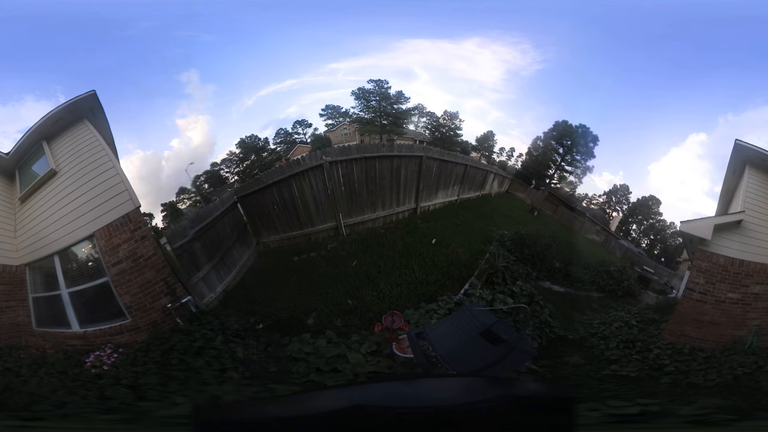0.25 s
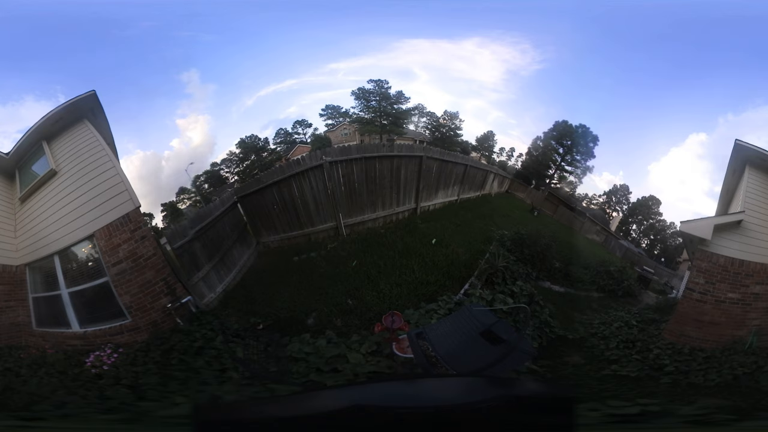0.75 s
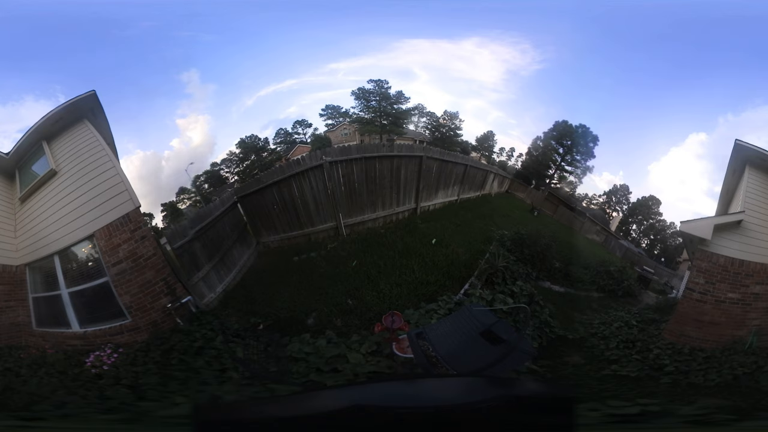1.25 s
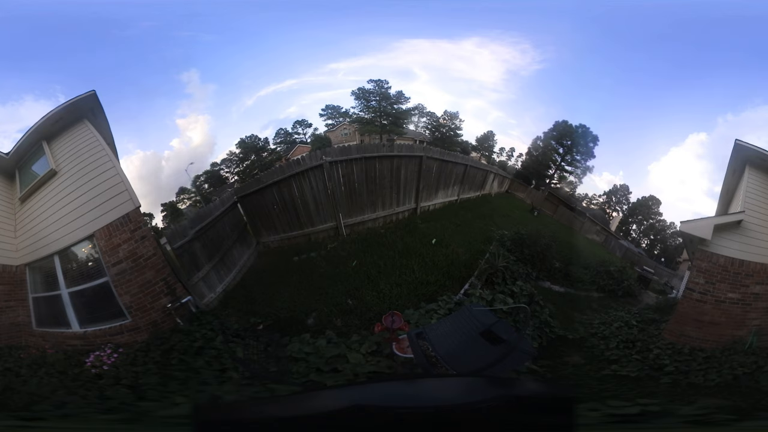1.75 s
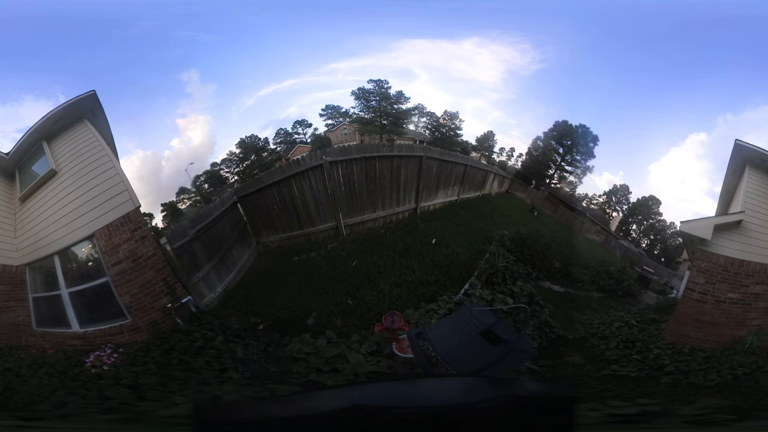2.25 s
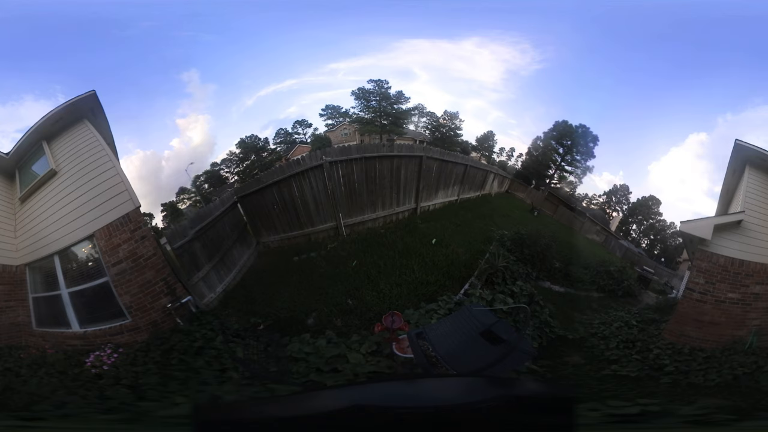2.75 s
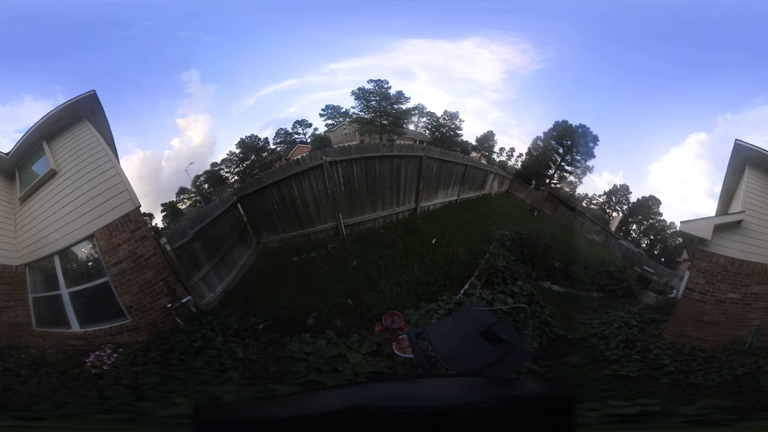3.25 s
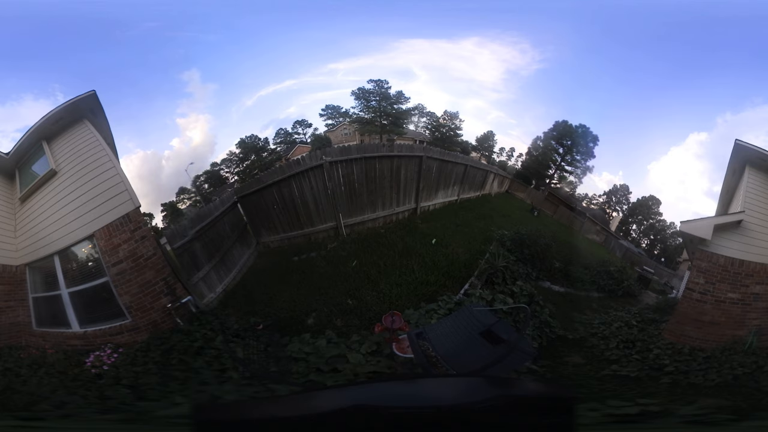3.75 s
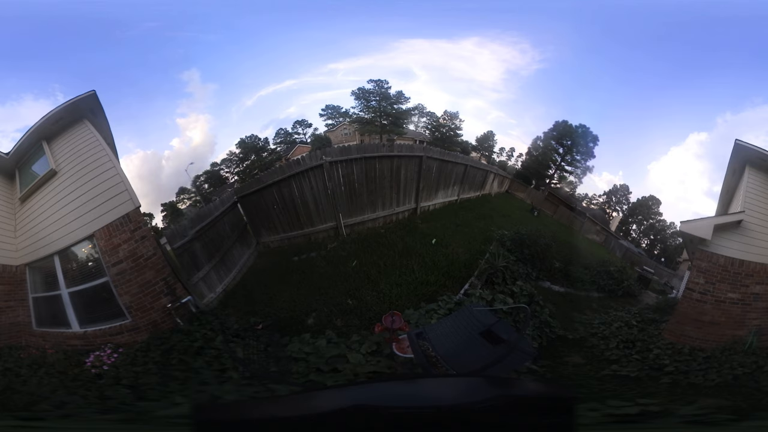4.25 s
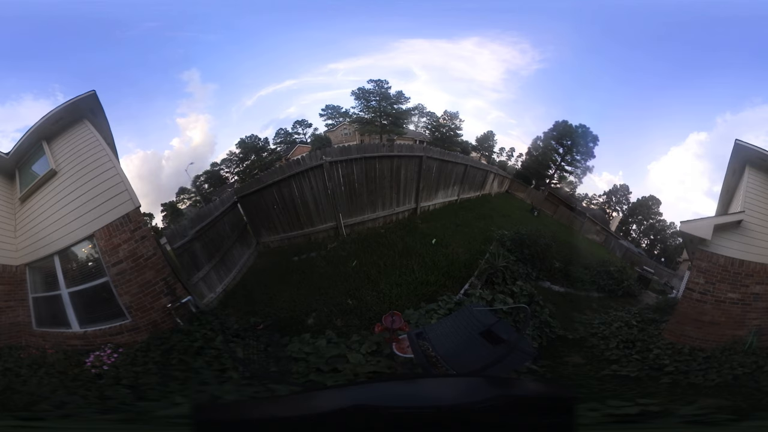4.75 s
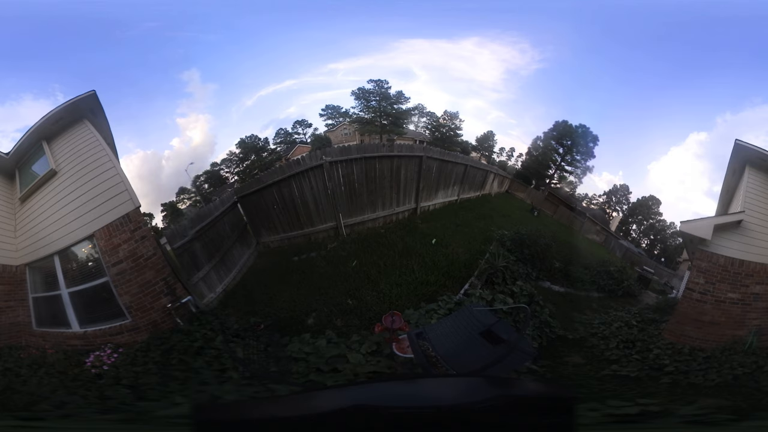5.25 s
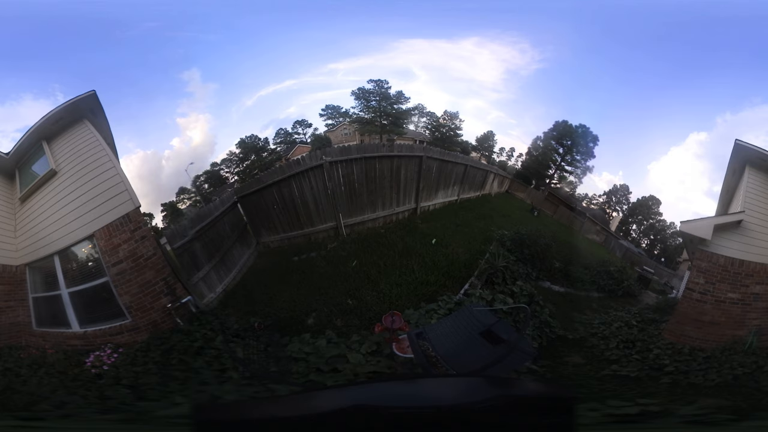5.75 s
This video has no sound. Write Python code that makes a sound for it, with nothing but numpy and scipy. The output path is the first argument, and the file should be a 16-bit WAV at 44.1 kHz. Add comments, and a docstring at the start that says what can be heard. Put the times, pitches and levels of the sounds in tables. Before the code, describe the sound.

A deep throbbing engine climbs in pitch and passes beyond a backyard fence with rushing tyres, while cicadas drone steadily and a bird whistles once.

```python
"""A low, throbbing drone, most like a six-cylinder engine, climbs in pitch and passes beyond a back-yard fence.
Its note, built from multiples of the engine cycle, swells and fades among the walls.
Filtered noise makes a rush of tyres, strongest when nearest, and a low neighbourhood wash.
Cicadas drone all round: wide noise bands, narrow unsteady tones and one buzz pulsed by clicks.
A bird gives one falling whistle: gliding sines with an echo and a short scattered tail."""
import sys
import numpy as np
from scipy import signal
from scipy.fft import rfft, irfft, next_fast_len
from scipy.io import wavfile
from scipy.ndimage import map_coordinates

SR = 44100
rng = np.random.default_rng(int(sys.argv[2]) if len(sys.argv) > 2 else 0)


def dump(signal):
    """Clip the signal to [-1, 1] and save it as 16-bit WAV at the path in sys.argv[1]."""
    limited = np.clip(np.atleast_2d(signal).T, -1, 1)
    pcm = np.round(limited * 32767).astype(np.int16)
    wavfile.write(sys.argv[1], SR, pcm)


N = 265658

# a straight road: the moment of closest approach, its distance, the road speed
NEAREST_S, DISTANCE_M, ROAD_M_PER_S = 2.85, 7.53, 15.44


def amp(db):
    """Decibels to gain."""
    return 10 ** (np.asarray(db) / 20)


def unit(x):
    """Scale to rms 1."""
    return x / np.sqrt(np.mean(np.abs(x) ** 2) + 1e-20)


def along(points, hz):
    """Read (frequency [Hz], value) points along a log frequency axis."""
    point_hz, value = np.transpose(points)
    return np.interp(np.log(hz + 1), np.log(point_hz), value)


def curves(rows):
    """One value per sample for each column after the time."""
    time_s, *columns = np.transpose(rows)
    return [np.interp(np.arange(N) / SR, time_s, column) for column in columns]


def wobble(rate, size=256):
    """A smooth random curve, rate knots a second, computed every size samples."""
    at = np.arange(0, N + size, size)
    knots = rng.standard_normal(size)
    smooth = map_coordinates(knots, [at * rate / SR], mode="mirror")
    return np.interp(np.arange(N), at, smooth)


def phase_of(hz):
    """Running phase [rad] of a moving frequency."""
    return 2 * np.pi * np.cumsum(hz) / SR


def filtered(x, response):
    """Multiply the spectrum of x by a response of frequency."""
    padded = next_fast_len(N + SR // 4)
    spectrum = rfft(x, padded) * response(np.fft.rfftfreq(padded, 1 / SR))
    return irfft(spectrum, padded)[..., :N]


def noise(spectrum):
    """Noise of rms 1 with the given colour."""
    return unit(filtered(rng.standard_normal(N), lambda hz: amp(along(spectrum, hz))))


def diffuse(spectrum):
    """Stereo noise of rms 1 from all round: mostly alike in the bass, less so at the top."""
    # left-right likeness: (frequency [Hz], correlation [0 to 1])
    likeness = [(60, 0.81), (250, 1), (510, 0.77), (1040, 0.84), (2120, 0.74), (4000, 0.49)]

    def mid_side(hz):
        turn = np.arccos(np.clip(along(likeness, hz), -1, 1)) / 2
        return amp(along(spectrum, hz)) * [np.cos(turn), np.sin(turn)]

    mid, side = filtered(rng.standard_normal((2, N)), mid_side)
    return unit(np.array([mid + side, mid - side]))


def placed(x, left_db):
    """Pan a source, making the left louder than the right by left_db."""
    return x * amp([[left_db / 2], [-left_db / 2]])


def fading(phase, scatter, rate):
    """A tone of about rms 1 plus its reflections, which shift at random."""
    in_phase = (1 + scatter * wobble(rate)) * np.cos(phase)
    quadrature = scatter * wobble(rate) * np.sin(phase)
    return (in_phase + quadrature) / np.sqrt(.5 + scatter ** 2)


def echo(x, delay_s, gain):
    """A delayed copy off a wall."""
    return gain * filtered(x, lambda hz: np.exp(-2j * np.pi * hz * delay_s))


def walls(x, gain, longest_s, count=6):
    """A few fixed reflections in each channel ripple the colour of a steady sound."""
    delays = rng.uniform(longest_s / 5, longest_s, (count, 2, 1))

    def ripple(hz):
        return 1 + gain * sum(np.exp(-2j * np.pi * hz * d) for d in delays)

    return filtered(x, ripple) / np.sqrt(1 + count * gain ** 2)


def neighbourhood():
    """The low wash of the neighbourhood is diffuse noise, heaviest in the bass."""
    # colour of the wash: (frequency [Hz], relative density [dB per Hz])
    yard_colour = [(20, -20), (50, 1.5), (130, 8.5), (300, 4), (450, -7), (550, -5), (680, -10),
                   (1000, -10), (2000, -17.5), (3200, -20.5), (6000, -31.5), (9000, -47)]
    return placed(amp(-44) * diffuse(yard_colour), left_db=2.5)


def singers():
    """Narrow shrill pitches swell out of the chorus and sink back, shimmering apart on each side."""
    # single insects: (pitch [Hz], peak level [dB], time of the peak [s],
    # time from the peak to half gain [s], left-right difference [dB])
    shrill = [(4198, -68.5, .3, .9, 6), (5580, -73, .4, 1.2, 3), (3720, -77, 2, 2, 4),
              (5048, -72, 3.3, .9, 4), (5290, -71, 3.5, 1.3, -2), (6101, -73, 3.8, .8, 2),
              (5950, -76, 3, 2, -2), (4311, -70, 4.1, 1.2, 6), (4850, -71, 4.3, .7, 2),
              (4269, -68, 4.5, .9, 6), (4610, -68, 5.3, .9, 2), (4198, -68, 5.7, 1, 7)]
    t, sound = np.arange(N) / SR, 0
    for hz, db, peak_s, half_s, left_db in shrill:
        pair = np.array([
            fading(2 * np.pi * (hz * t + rng.random()), scatter=.7, rate=16)
            for _ in range(2)
        ])
        swell = amp(db) / np.hypot(1, (t - peak_s) / half_s) ** 2
        sound += placed(swell * pair, left_db)
    return sound


def chorus():
    """Many tymbals blur into a wide hiss, ridged by the walls, with a few steady pitches."""
    # colour of the middle and of the sides: (frequency [Hz], relative density [dB per Hz])
    trees_mid = [(2800, -40), (3600, -8.5), (4200, -4), (5200, 0), (6000, -2), (6800, -8), (8000, -7.5),
                 (8800, -12), (9500, -24.5)]
    trees_side = [(2800, -18.5), (3600, -16.5), (4600, -15.5), (5350, 0.5), (6000, -6), (6700, -5.5),
                  (7700, -5), (8700, -12), (9500, -33.5)]
    mid = noise(trees_mid) * amp(-6.0)
    side = noise(trees_side) * amp(-1.5)
    # the hiss holds its level, then swells slowly
    start_db, swell_from_s, swell_db_per_s = -54.5, 3.54, 1.5
    t = np.arange(N) / SR
    level_db = start_db + swell_db_per_s * np.maximum(t - swell_from_s, 0)
    hiss = amp(level_db + 0.19 * wobble(3.1)) * np.array([mid + side, mid - side])
    ridged = walls(hiss, gain=.11, longest_s=.022)
    return placed(ridged, left_db=-2.0) + singers()


def cicada():
    """One nearer insect buzzes at its click rate; the house wall combs its band into ridges."""
    # colour of its body: (frequency [Hz], relative density [dB per Hz])
    solo_body = [(3000, -45.5), (3800, 3), (4250, 7.5), (4700, 4.5), (5600, -4.5), (7000, -37)]
    click_hz = 76.5 + .4 * wobble(2)
    clicks = unit(1 + .4 * np.cos(phase_of(click_hz)))
    # the buzz sinks to a lull and recovers; the wall then adds to its level
    mean_db, lull_db, lull_s, period_s = -63, 1.5, 1.6, 8
    lull = np.cos(2 * np.pi * (np.arange(N) / SR - lull_s) / period_s)
    buzz = amp(mean_db - lull_db * lull) * clicks * noise(solo_body)
    combed = buzz + echo(buzz, delay_s=.01047, gain=.55)
    return placed(combed, left_db=10.0)


def cicadas():
    """The far chorus and its nearest member sound together."""
    return chorus() + cicada()


def bird(echo_db=-16, wet_db=-8, t60=0.33):
    """One whistle falls in pulses and splits, answered by a house wall and scattered by the trees."""
    # the fall flattens out in broken pulses: (time [s], pitch [Hz], level of the upper voice [dB])
    whistle = [(1.03, 3000, -76), (1.052, 3120, -66), (1.085, 3170, -55), (1.103, 3140, -64),
               (1.125, 3110, -53), (1.145, 3120, -48), (1.163, 3020, -60), (1.18, 2980, -54.5),
               (1.205, 2925, -59), (1.24, 2920, -48), (1.256, 2890, -75), (1.272, 2840, -57.5),
               (1.302, 2825, -52.5), (1.322, 2760, -65), (1.355, 2730, -58), (1.38, 2700, -72)]
    hz, level_db = curves(whistle)
    now = np.arange(N) / SR
    upper_voice = np.sin(phase_of(hz))
    lower_voice = np.interp(now, [1.24, 1.35], [0, .35]) * np.sin(.943 * phase_of(hz))
    sounding = (now > whistle[0][0]) * (now < whistle[-1][0])
    call = sounding * amp(level_db) * np.sqrt(2) * (upper_voice + lower_voice)
    # the scattered tail dies by 60 dB in t60 seconds
    t = np.arange(SR // 2) / SR
    tail = rng.standard_normal((2, len(t))) * amp(-60 * t / t60)
    tail /= np.linalg.norm(tail[0])
    scattered = signal.fftconvolve(call[None], tail, axes=1)[:, :N]
    wall = echo(call, delay_s=.11, gain=amp(echo_db))
    return placed(call + wall + amp(wet_db) * scattered, left_db=1.0)


def road():
    """The share of the speed that points away from the yard, and the range in metres."""
    ahead_m = ROAD_M_PER_S * (np.arange(N) / SR - NEAREST_S)
    range_m = np.hypot(ahead_m, DISTANCE_M)
    return ahead_m / range_m, range_m


def passing(near_db, loss_db, rear_db):
    """Gain near_db when closest, loss_db less per doubled range, up to rear_db more behind or less ahead."""
    away, range_m = road()
    return amp(near_db - loss_db * np.log2(range_m / DISTANCE_M) + rear_db * away)


def tyres(cycle, count):
    """Diffuse tyre noise rises and falls with range, pulsed by gas escaping into the rush."""
    # colour of the rush: (frequency [Hz], relative density [dB per Hz])
    tyre_colour = [(400, -4.5), (650, -5), (1000, -6), (1300, -8.5), (1640, -13.5), (2100, -10.5),
                   (2900, -17), (4000, -18.5), (5500, -23.5), (8800, -50)]
    # once an engine cycle, and once for every two firings
    puffs = 1 + .15 * np.cos(cycle) + .15 * np.cos(count / 2 * cycle)
    rush = passing(near_db=-46.0, loss_db=7.5, rear_db=3.0) * puffs * diffuse(tyre_colour)
    return placed(rush, left_db=0.5)


def engine_wash():
    """The engine's wash, scattered by houses and fences, is low noise with a moving level."""
    # colour: (frequency [Hz], relative density [dB per Hz])
    wash_body = [(60, -27.5), (100, 7), (150, -2), (250, -1.5), (310, -3.5), (400, -17.5), (600, -57)]
    # (time [s], level [dB])
    wash_level = [(0, -45), (.8, -44), (1.6, -47), (2.7, -43), (3.3, -43.5), (4, -48), (5.2, -55),
                  (6.02, -49)]
    return noise(wash_body) * amp(curves(wash_level)[0])


def outflow(cycle):
    """Puffs of gas ring the tailpipe; Doppler lowers the pitch and the ring is least steady when nearest."""
    # strongest shortly after the closest point: (time [s], level [dB])
    ring_level = [(2.2, -72), (2.7, -54), (3.1, -47.5), (3.5, -48.5), (3.85, -55), (4.3, -66), (6.02, -78)]
    ring_hz, sound_m_per_s = 645.6, 343  # the pitch before the Doppler shift
    away, range_m = road()
    phase = phase_of(ring_hz / (1 + ROAD_M_PER_S * away / sound_m_per_s))
    scatter = .45 + .6 * (DISTANCE_M / range_m) ** 4
    ring = (1 + .4 * np.cos(cycle)) * fading(phase, scatter, rate=35)
    return unit(ring) * amp(curves(ring_level)[0])


def register(cycle, cycle_hz, order, weights_db, smear, scatter, rate):
    """Multiples of the cycle from unequal cylinders, near rms 1; pipe and reflections smear each beat."""
    # colour of pipe and silencer: (frequency [Hz], relative gain [dB])
    muffler = [(60, -36), (72, -14), (90, -10.5), (115, 6), (128, 10), (138, -2), (152, 7), (172, 14.5),
               (195, 7), (225, 5.5), (250, 4.5), (285, 9), (315, 5), (350, 5.5), (385, 5), (420, -1.5),
               (452, 5.5), (495, -7.5), (555, 4.5), (590, -1.5), (630, 1.5), (700, -8)]
    sound, power = 0, 0
    for k, db in zip(order, weights_db):
        gain = amp(db + along(muffler, k * cycle_hz))
        drawn_out = .27 * (k - np.median(order) - 1) ** 2
        phase = k * cycle + drawn_out + smear * wobble(1)
        sound += gain * fading(phase, scatter, rate)
        power += gain ** 2
    return sound / np.sqrt(power)


def low_register(cycle, cycle_hz):
    """A throb on either side of the note and a boom round its octave come from unequal cylinders."""
    # each before a small trim: (time [s], level [dB])
    throb_level = [(0.0, -59), (1.5, -46), (1.94, -45.5), (2.82, -38.4), (3.12, -52), (3.22, -42),
                   (3.38, -52.5), (3.94, -39.5), (4.18, -43), (4.44, -39.5), (4.9, -40.5), (6.02, -48)]
    boom_level = [(0.0, -47.5), (0.52, -43), (1.2, -51.7), (1.36, -42), (1.7, -38), (2.28, -33),
                  (2.58, -37), (2.74, -39), (2.9, -35), (3.48, -35.5), (3.62, -43.5), (3.82, -37.5),
                  (4.32, -41), (5.1, -44), (5.66, -42), (6.02, -56)]
    throb = register(cycle, cycle_hz, (4, 5, 7, 8), (0, -1, -10, -22), smear=.5, scatter=.08, rate=4)
    boom = register(cycle, cycle_hz, (9, 10, 11, 13), (-3, -3, 0, -1), smear=1.6, scatter=.08, rate=6)
    # the throb enters with its polarity inverted
    return boom * amp(curves(boom_level)[0] - 0.04) - throb * amp(curves(throb_level)[0] + 0.1)


def growl_register(cycle, cycle_hz):
    """A growl round the twelfth over turbulent gas; its beat is blurred on the far approach, then sharp."""
    # (time [s], level [dB])
    growl_level = [(0.0, -58.5), (0.06, -46), (0.4, -56), (0.56, -47), (0.64, -55), (1.3, -50), (1.62, -52),
                   (2.2, -47), (2.44, -55.5), (2.54, -41), (3.4, -34), (3.48, -41.5), (3.9, -43.2),
                   (4.04, -38), (4.3, -43), (5.12, -39.5), (5.7, -50.7), (6.02, -63.5)]
    # turbulent gas under the growl: (frequency [Hz], relative density [dB per Hz])
    gas_colour = [(150, -27.5), (240, 2), (300, 0.5), (350, 7.5), (400, 4.5), (480, -45)]
    away = road()[0]
    blur = .3 + .9 * np.maximum(-away, 0) ** 6
    growl = register(cycle, cycle_hz, (14, 15, 16, 17, 19), (-11, -4, -4, 0, -8),
                     smear=blur, scatter=.13, rate=8)
    gas = unit((1 + .3 * np.cos(cycle)) * noise(gas_colour))
    return (growl + amp(-16) * gas) * amp(curves(growl_level)[0])


def snarl_register(cycle, cycle_hz):
    """The snarl is a band of cycle multiples above the growl."""
    # before a small trim: (time [s], level [dB])
    snarl_level = [(0.0, -58), (0.42, -43), (0.66, -61), (0.98, -53), (1.16, -64), (1.72, -55.5),
                   (1.88, -39.5), (2.08, -52.5), (2.22, -49), (2.74, -41.5), (2.9, -39.5), (2.98, -43),
                   (3.32, -42), (3.66, -48), (4.32, -56.5), (4.78, -62), (5.04, -58), (5.48, -59),
                   (5.9, -63.5), (6.02, -66.4)]
    snarl = register(cycle, cycle_hz, range(20, 26), (-4, -5, 0, -2, -2, -8),
                     smear=1.5, scatter=.2, rate=10)
    return snarl * amp(curves(snarl_level)[0] - 0.9)


def rasp_register(cycle, cycle_hz):
    """The rasp is the topmost band of cycle multiples, louder from behind."""
    rasp = register(cycle, cycle_hz, range(26, 47), np.zeros(21), smear=1.4, scatter=.35, rate=10)
    return rasp * passing(near_db=-47.5, loss_db=12, rear_db=8.0)


def exhaust(firing):
    """The clean note of the firings and its two overtones, each swelling and fading among the walls."""
    # firing note, then octave and twelfth before small trims: (time [s], level [dB])
    note_level = [(0.0, -42), (0.18, -33.5), (0.26, -43.5), (0.38, -28), (0.52, -28.5), (0.68, -41.5),
                  (1.24, -30), (1.84, -39), (2.38, -24.5), (3.22, -31), (3.36, -20.5), (3.94, -30.5),
                  (4.04, -26), (4.54, -29.5), (4.88, -26.0), (5.26, -30.5), (5.4, -24.5), (5.64, -30),
                  (5.76, -43.5), (5.8, -37.5), (5.9, -33.5), (6.02, -49)]
    octave_level = [(0.0, -49), (0.1, -37.5), (0.88, -33.5), (1.02, -44), (1.06, -38), (1.48, -32.5),
                    (1.76, -40.5), (2.34, -32.5), (2.44, -67), (2.5, -40.5), (2.74, -30.5), (2.9, -36),
                    (3.02, -27), (3.18, -38.5), (3.28, -32.5), (3.6, -48.5), (3.74, -37), (4.44, -58),
                    (4.58, -39), (5.2, -57.5), (5.3, -41), (6.02, -61.5)]
    twelfth_level = [(0.0, -56), (0.4, -43.5), (0.6, -40), (0.8, -54), (0.94, -44), (1.56, -53.5),
                     (1.94, -41.5), (2.08, -53), (2.22, -37.7), (2.54, -44), (2.66, -36), (2.88, -35.5),
                     (3.04, -44.5), (3.8, -45.5), (3.92, -53.7), (4.3, -48.5), (4.7, -59.5), (5.32, -44.5),
                     (5.94, -75), (6.02, -73.1)]
    first = amp(curves(note_level)[0]) * fading(firing, scatter=.04, rate=6.8)
    second = amp(curves(octave_level)[0] + 0.15) * fading(2 * firing + np.pi / 2, scatter=.08, rate=11)
    third = amp(curves(twelfth_level)[0] - .3) * fading(3 * firing, scatter=.07, rate=7.8)
    return first + second + third


def vehicle(count=6):
    """One engine cycle of count firings drives every register, the tailpipe's ring and the tyre puffs."""
    # the firing rate climbs, ever more slowly: (time [s], firing rate [Hz])
    firing_rate = [(0, 74.6), (.25, 78.4), (.75, 81.8), (1, 85.4), (1.7, 91.8), (2.5, 96.6), (3, 100.2),
                   (3.25, 101.2), (4, 105.6), (5.25, 110.6), (6.02, 113)]
    cycle_hz = curves(firing_rate)[0] / count
    cycle = phase_of(cycle_hz)
    low = low_register(cycle, cycle_hz)
    middle = growl_register(cycle, cycle_hz)
    edge = snarl_register(cycle, cycle_hz)
    high = rasp_register(cycle, cycle_hz) + outflow(cycle)
    engine = exhaust(count * cycle) + low + middle + edge + high + engine_wash()
    return placed(engine, left_db=2) + tyres(cycle, count)


def scene():
    """The passing engine, the insects and the bird over the low wash of the neighbourhood."""
    return neighbourhood() + cicadas() + bird() + vehicle()


def record(dry):
    """A sharp band limit removes everything from 9350 Hz up."""
    top_hz = 9350
    return filtered(dry, lambda hz: hz < top_hz)


dry = scene()
out = record(dry)
dump(out)
```